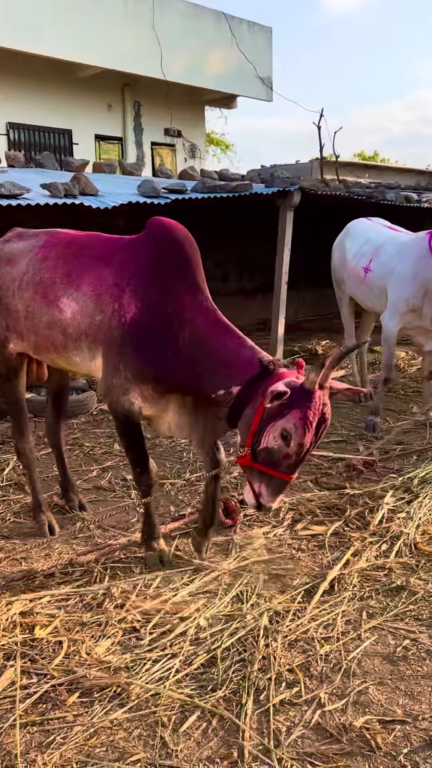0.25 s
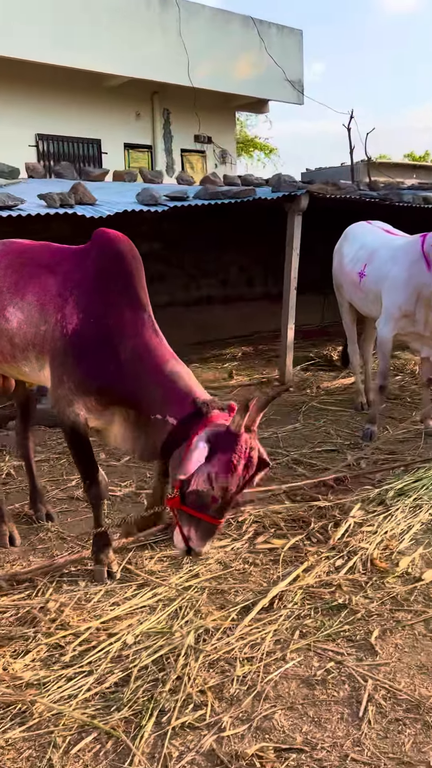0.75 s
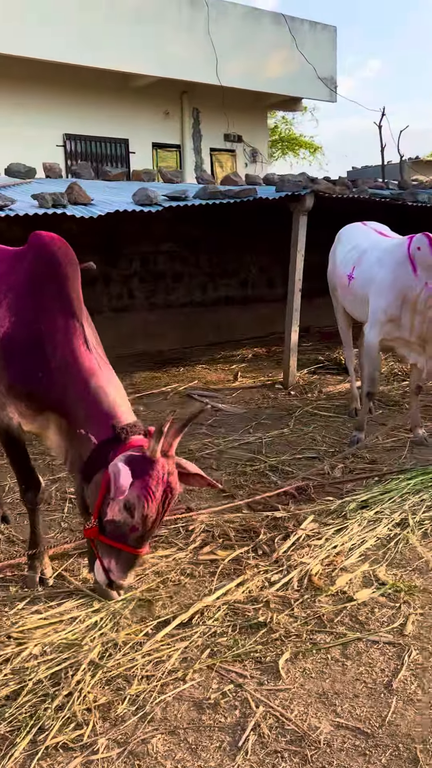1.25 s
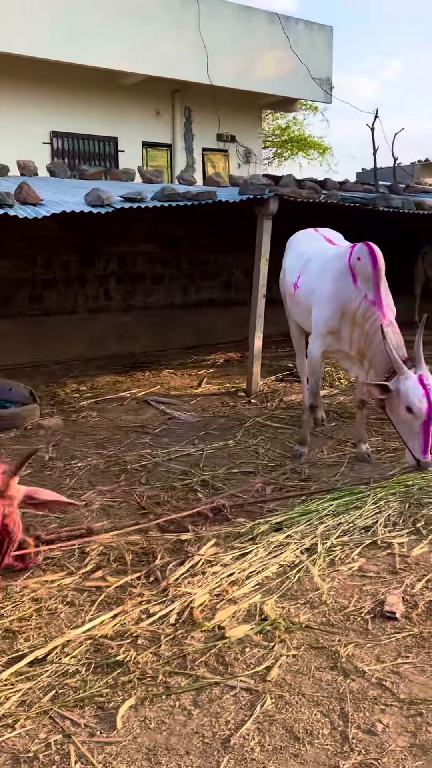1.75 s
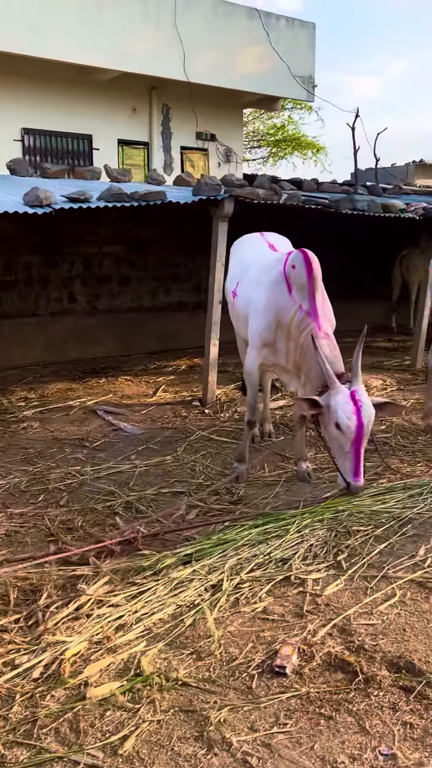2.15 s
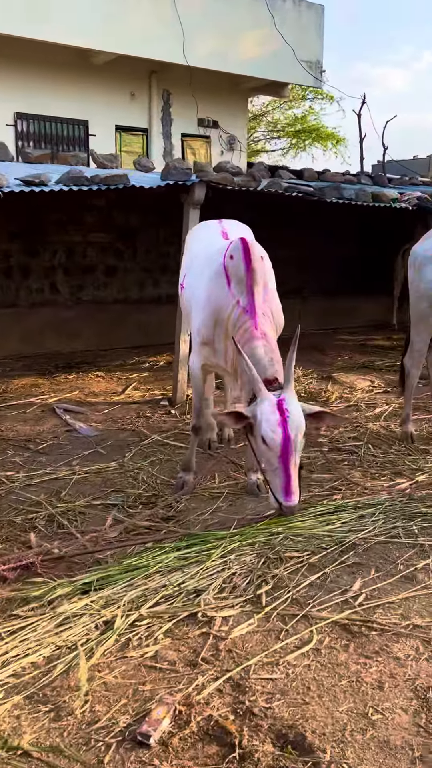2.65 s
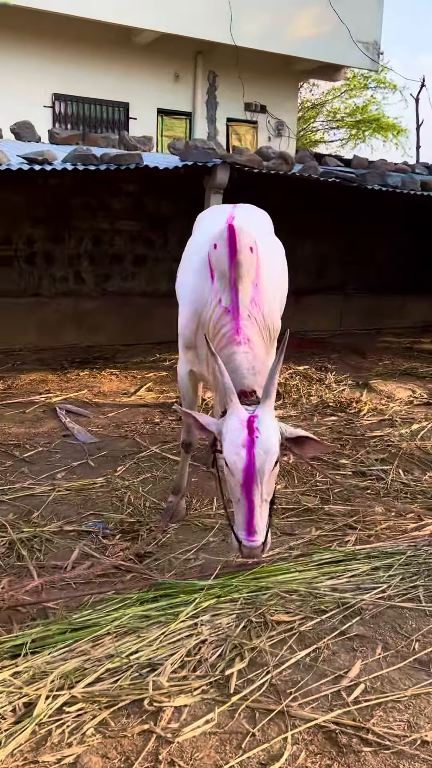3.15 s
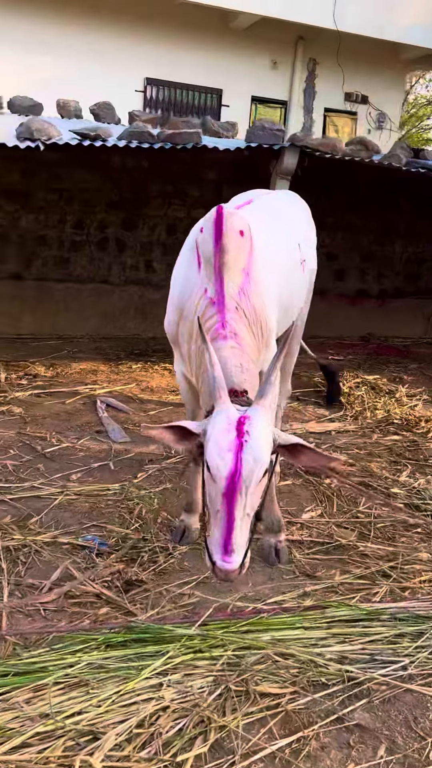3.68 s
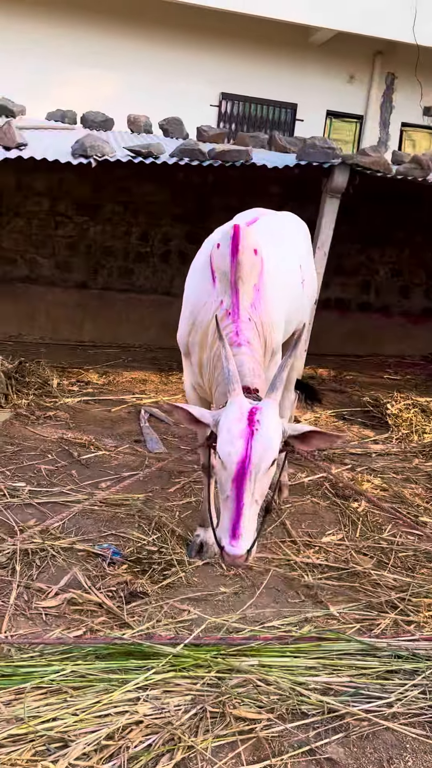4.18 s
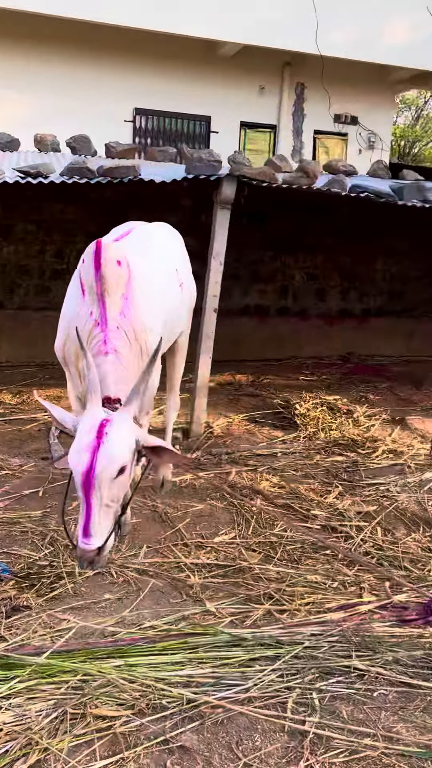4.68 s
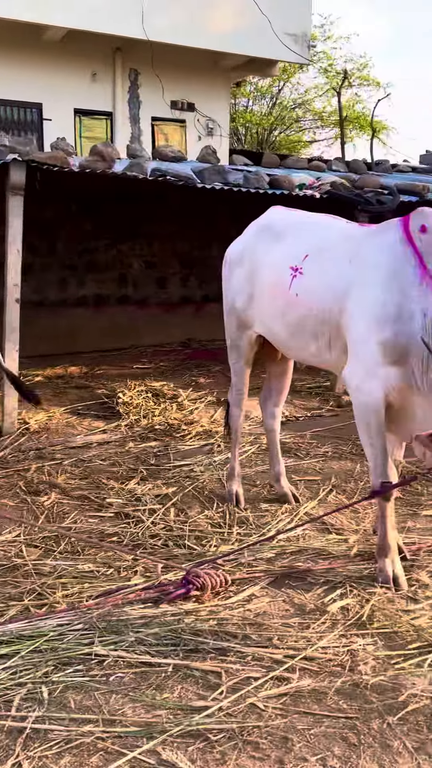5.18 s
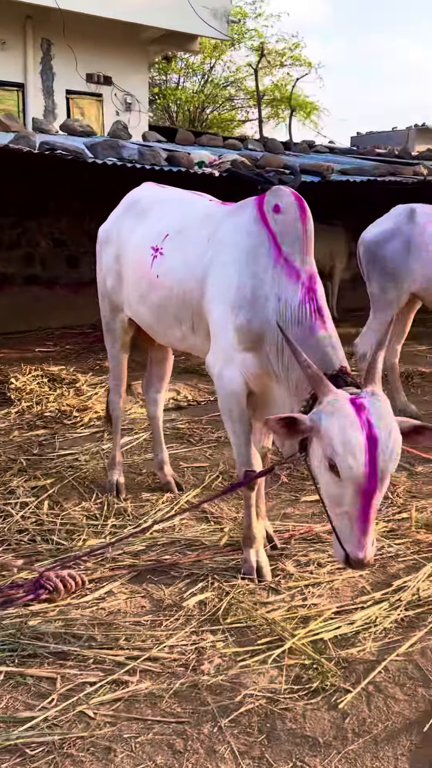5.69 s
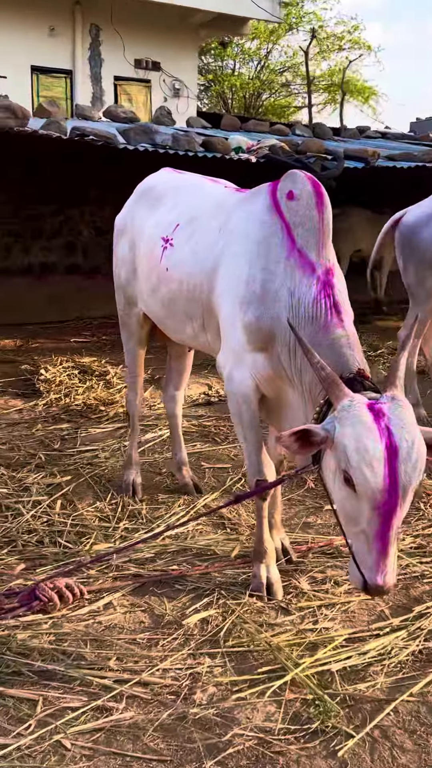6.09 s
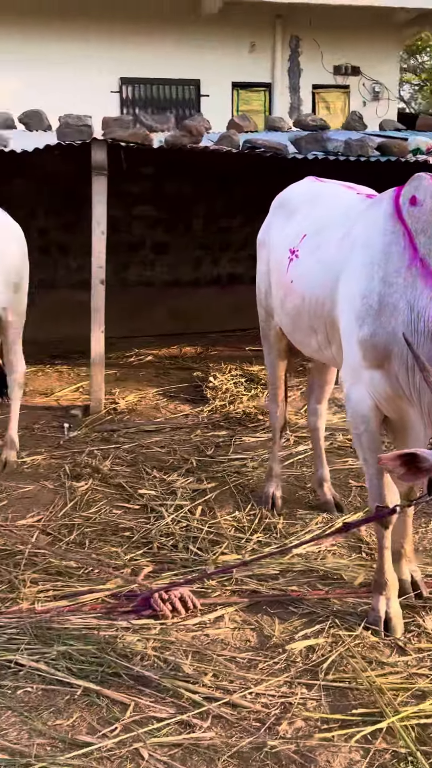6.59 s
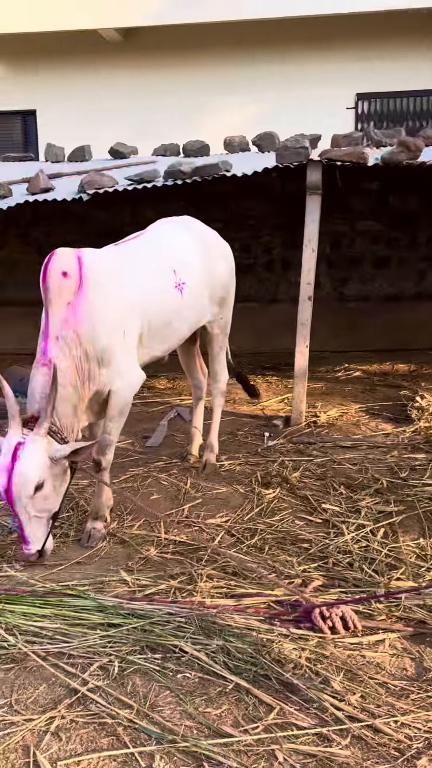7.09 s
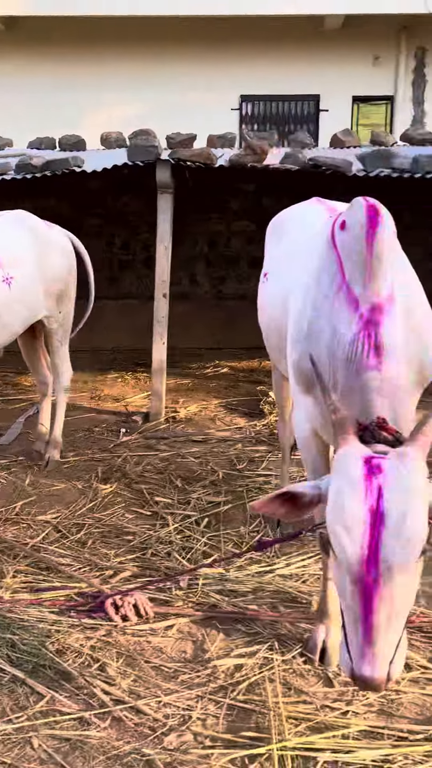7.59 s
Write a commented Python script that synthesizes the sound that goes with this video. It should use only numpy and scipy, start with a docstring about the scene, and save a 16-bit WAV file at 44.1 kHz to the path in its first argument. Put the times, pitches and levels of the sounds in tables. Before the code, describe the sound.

Close to a hand-held stereo microphone in an open farmyard, bullocks crush dry straw. A busy crackling burst opens, then eases to near quiet. Stronger crunches return with a breathy nostril blow, then isolated hard bites and snaps, followed by steady chewing rustle and little hollow knocks. Low wind and a distant engine drawing away lie beneath; faint birds chirp.

```python
"""Bullocks nose through and chew dry straw in an open yard, close to a hand-held pair of microphones.
From the start: crushed and loose straw (dense cracks ringing in stems), sharp snaps (noise bursts through
a resonance), wind (coloured noise) and a far engine (sine orders of a gliding firing rate) underneath.
From 1.6 s nostrils blow (flutter on shaped noise); from 2.3 s a bird chirps (gliding sines).
From 4.5 s a hollow stem is knocked (decaying modes); from 4.8 s the housing thumps (low dying sines)."""
import sys
import numpy as np
from scipy import signal
from scipy.fft import rfft, irfft, next_fast_len
from scipy.io import wavfile

SR = 44100
rng = np.random.default_rng(int(sys.argv[2]) if len(sys.argv) > 2 else 0)


def transcribe(signal):
    """Save signal, clipped to [-1, 1], as a 16-bit WAV file at the path in sys.argv[1]."""
    frames = np.atleast_2d(signal).T
    limited = np.clip(frames, -1, 1)
    pcm = np.round(limited * 32767).astype(np.int16)
    wavfile.write(sys.argv[1], SR, pcm)


N = 345744
PAD = next_fast_len(N + 8192)   # FFT length, samples

# Levels are at the source, ahead of stem resonances, port shading and output stage.
# Stalks crushed by a tug or bite: [t/s, length/s, stalk level/dB, husk level/dB]
CRUNCHES = [(0.019, 0.016, -16.5, -23), (0.059, 0.014, -21, -30), (0.11, 0.017, -27, -39),
            (0.13, 0.022, -20.5, -29), (0.16, 0.022, -21, -22.5), (0.193, 0.05, -16, -27),
            (0.258, 0.054, -18, -27.5), (0.321, 0.1, -24.5, -34), (0.46, 0.051, -32, -49),
            (0.515, 0.045, -27, -35), (0.578, 0.06, -30, -37), (0.657, 0.065, -33, -36.5),
            (0.755, 0.069, -37, -44), (0.957, 0.066, -38.5, -41), (1.052, 0.086, -44, -43.5),
            (1.406, 0.061, -36.5, -41.5), (1.483, 0.091, -30, -35), (1.577, 0.052, -20, -25.5),
            (1.64, 0.042, -14, -24), (1.701, 0.06, -21, -29), (1.78, 0.045, -15, -25),
            (1.867, 0.023, -15.5, -26), (1.909, 0.078, -20.5, -35), (2, 0.037, -22, -28),
            (2.083, 0.043, -22, -37), (2.157, 0.076, -25.5, -50), (2.174, 0.14, -31, -33.5),
            (2.464, 0.062, -11.5, -17.5), (2.529, 0.016, -8.5, -14), (2.734, 0.15, -34, -39),
            (2.896, 0.095, -34, -38.5), (2.972, 0.043, -26.5, -31.5), (3.039, 0.055, -20.5, -28),
            (3.104, 0.073, -29, -31), (3.215, 0.074, -37.5, -44.5), (3.295, 0.11, -38.5, -40),
            (3.554, 0.05, -9.5, -21.5), (3.614, 0.042, -8, -16), (3.669, 0.078, -22, -25),
            (3.768, 0.11, -31.5, -37), (3.989, 0.068, -30.5, -36.5), (4.065, 0.05, -31.5, -32.5),
            (4.141, 0.079, -28.5, -33), (4.217, 0.072, -26.5, -31.5), (4.345, 0.087, -34.5, -40.5),
            (4.433, 0.092, -30.5, -36.5), (4.549, 0.072, -22, -31.5), (4.622, 0.061, -22.5, -32),
            (4.711, 0.06, -25, -35.5), (4.777, 0.071, -26, -31.5), (4.868, 0.065, -22.5, -36),
            (4.922, 0.086, -26.5, -31.5), (5.038, 0.085, -24.5, -32), (5.118, 0.041, -21.5, -32.5),
            (5.198, 0.071, -25, -34.5), (5.276, 0.042, -25, -32), (5.358, 0.055, -32.5, -36),
            (5.42, 0.099, -29.5, -39.5), (5.532, 0.083, -30.5, -41), (5.613, 0.051, -31, -38),
            (5.728, 0.046, -28, -39), (5.813, 0.057, -30.5, -37), (5.991, 0.049, -14, -19.5),
            (6.049, 0.048, -8.5, -20.5), (6.115, 0.066, -18, -25.5), (6.214, 0.057, -20, -31),
            (6.345, 0.029, -18.5, -29), (6.408, 0.042, -22.5, -28), (6.51, 0.057, -22.5, -31.5),
            (6.58, 0.071, -27, -31.5), (6.689, 0.06, -24.5, -30), (6.759, 0.076, -29, -31),
            (6.883, 0.073, -26, -31), (6.969, 0.069, -32, -34), (7.079, 0.094, -28.5, -41),
            (7.164, 0.069, -31, -34.5), (7.277, 0.038, -34, -38), (7.307, 0.037, -24, -31),
            (7.364, 0.056, -26, -30), (7.465, 0.075, -25.5, -34), (7.558, 0.047, -30, -38),
            (7.586, 0.11, -34.5, -41.5)]
# Loose straw shifting, curve: [t/s, dull level/dB, bright level/dB]
RUSTLE = [(0, -29, -33.5), (.6, -37, -42.5), (1.3, -52, -55.5), (1.9, -28, -45), (2.44, -43, -47.5),
          (2.6, -32, -38), (2.72, -46, -48.5), (3.0, -35.5, -47), (3.5, -52.5, -57.5), (3.75, -32, -38),
          (3.96, -48, -51), (4.1, -51, -41.5), (4.4, -62, -52), (5.2, -40.5, -47.5), (5.7, -44.5, -45.5),
          (6.4, -38.5, -42.5), (7.36, -44.5, -45), (7.7, -50, -52.5), (7.84, -53, -49.5)]
# Crushed-stalk spectrum: [f/Hz, relative level/dB per Hz]
BODY_SPECTRUM = [(88, -62), (150, 4), (203, -4.5), (282, 5), (480, -0.5), (700, -2.5), (1350, -5.5),
                 (1900, -11), (2600, -12.5), (4000, -36.5), (6000, -43)]
# Dry leaf and husk spectrum: [f/Hz, relative level/dB per Hz]
HUSK_SPECTRUM = [(1470, 17.5), (2500, -2.5), (4600, 2), (6000, -0.5), (8500, -10), (10500, -12.5),
                 (12500, -20), (16000, -13.5)]
# Hollow-stem resonances: [f/Hz, width/Hz, nominal lift/dB]
HOLLOWS = [(500, 90, 4), (2830, 90, 9), (4590, 250, 5)]
# Wind and rumble, curve: [t/s, level/dB]
WIND = [(0, -44), (.6, -32), (1.1, -37), (1.55, -42), (1.8, -34.5), (2.05, -42), (2.6, -45.5), (3.2, -34),
        (3.45, -47), (4.65, -43.5), (5.9, -46), (6.05, -37), (6.3, -42.5), (6.95, -37), (7.45, -31.5),
        (7.65, -37.5), (7.84, -26)]
# Wind and rumble spectrum: [f/Hz, relative level/dB per Hz]
RUMBLE_SPECTRUM = [(22, -11), (43, -3.5), (59, 8.5), (77, 2.5), (140, -10.5), (194, -16.5), (260, -21),
                   (340, -57.5)]
# Far engine gathering speed and drawing away, curve: [t/s, firing f/Hz, level/dB]
ENGINE = [(0, 42.3, -39.5), (1.2, 47.25, -39.5), (2.2, 52.24, -45), (3.2, 55.8, -47), (4.5, 56.4, -51.5),
          (7.84, 56.8, -66)]
# Engine orders: [multiple of firing rate, relative level/dB]
ENGINE_ORDERS = [(1, -1.5), (2, -5.5), (3, -9.5)]
# Single stalks snapping: [t/s, peak level/dB, pitch f/Hz]
SNAPS = [(0.034, -13.5, 355), (0.063, -11.5, 2800), (0.116, -12, 1910), (0.135, -13, 890),
         (0.152, -16, 576), (0.166, -7.5, 1950), (0.2063, -11, 1780), (0.206, -11.5, 594),
         (0.279, -10, 336), (0.306, -18, 300), (0.372, -20, 330), (1.594, -15, 1100), (1.6432, -8, 1800),
         (1.652, -8.5, 4620), (1.729, -12.5, 510), (1.872, -12.5, 450), (2.064, -14.5, 1540),
         (2.171, -16, 1310), (2.3196, -21, 4070), (2.4696, -6.5, 4500), (2.481, -10, 710),
         (2.491, -13.5, 1180), (2.535, -8, 3000), (2.738, -29.5, 398), (2.829, -26.5, 410),
         (2.898, -30, 404), (2.986, -17.5, 373), (2.986, -22, 4930), (3.0518, -17.5, 416),
         (3.053, -10.5, 4770), (3.3055, -20, 1290), (3.328, -31, 4500), (3.563, -15, 2850),
         (3.571, -3, 2720), (3.632, -9, 1150), (3.802, -24, 1490), (4.1486, -23, 4800), (4.579, -16, 576),
         (4.719, -22, 1550), (4.732, -14, 1620), (4.744, -22.5, 474), (4.792, -24, 2640),
         (4.881, -11, 1480), (5.06, -21.5, 400), (5.151, -19, 1370), (5.204, -24, 1350),
         (5.455, -18.5, 463), (5.5142, -22.5, 1200), (5.547, -21, 1000), (5.571, -28, 1400),
         (5.621, -23, 393), (5.742, -32, 446), (5.9988, -5, 1600), (6.009, -7, 1700), (6.0668, -12, 3880),
         (6.323, -11.5, 1540), (6.414, -19, 343), (6.427, -26, 420), (6.532, -15.5, 376),
         (6.531, -14, 4540), (6.602, -21, 1790), (6.71, -18, 440), (6.711, -23, 1290), (7.3762, -17, 4630),
         (7.487, -16, 1010), (7.488, -18, 507), (7.559, -18, 4200)]
# Air blown through the nostrils: [t/s, length/s, level before sag/dB]
SNORTS = [(1.605, 0.65, -22.5), (3.572, 0.17, -28.5), (6.009, 0.54, -27)]
# Nostril noise spectrum: [f/Hz, relative level/dB per Hz]
NOSTRIL_SPECTRUM = [(2500, -30), (3600, -6), (4600, -2), (5700, -7), (6500, -2), (7700, 0), (8600, -10),
                    (10300, -16), (11500, -13), (12700, -23), (13500, -17), (16000, -24)]
# Bird chirps: [t/s, length/s, start f/Hz, f at a quarter/Hz, end f/Hz, level/dB]
CHIRPS = [(2.265, .06, 3050, 3150, 3150, -43), (4.3, .082, 1380, 1400, 1400, -36),
          (7.705, .034, 4080, 4060, 4000, -48), (7.747, .08, 2600, 3060, 3060, -46),
          (7.75, .018, 3950, 4080, 4050, -50), (7.801, .018, 4050, 4100, 4100, -49)]
# Hollow stem knocked: [t/s, contact level/dB]
KNOCKS = [(4.5453, -23), (4.654, -18.5), (4.861, -17), (5.1178, -18.5), (5.7163, -16), (5.885, -25.5),
          (6.134, -19)]
# Modes of the knocked stem: [f/Hz, relative level/dB, t60/s]
KNOCKED_STEM = [(720, -11, .015), (1330, 0, .028), (2080, -4, .012)]
# Low knocks on the hand-held housing: [t/s, level before swell and decay/dB, f/Hz, t60/s]
THUMPS = [(4.762, -1, 77, 0.028), (7.686, -12.5, 69.6, 0.13), (7.8, -13.5, 81.7, 0.8)]
# Left over right port: [f/Hz, level difference/dB]
PORT_SHADE = [(60, -.7), (200, -4), (450, -9.5), (800, -10.5), (1450, -4), (1800, -10), (2300, -2),
              (3000, 2), (4400, 3.5), (5500, 1), (7000, 1), (10000, 0)]
# Share of power unlike in the two ports: [f/Hz, share/0-1]
SPREAD = [(60, .03), (500, .03), (1000, .12), (3200, .2), (4600, .08), (6200, .25), (7500, .06),
          (9000, .004), (16000, .002)]
# Phase lag of left behind right, wound by the path round the housing: [f/Hz, lag/turns]
STRAW_TURNS = [(0, 0), (900, .35), (1400, .26), (1900, .4), (2300, .52), (2800, .72), (4300, 1),
               (5800, 1.35), (7000, .95), (8200, 1.1)]
SNORT_TURNS = [(0, 0), (3000, 1.5), (4200, 1.92), (5200, 1.85), (5650, 1.5), (6500, 1.2), (7400, 1),
               (8200, 1)]
WIND_TURNS = [(0, 0.045), (300, 0.073)]
# Continuation of all three lags at the top: [f/Hz, lag/turns]
TREBLE_TURNS = [(9200, 1.5), (10200, 1.5), (11000, 2), (12300, 2), (12750, 2.5), (14100, 2.5), (14800, 3)]

SWELL_SHARE, FALL_SHARE = 0.41, 0.44   # of a crunch's length
SETTLE_T60_S, SETTLE_DULL_DB, SETTLE_BRIGHT_DB = 0.25, -15, -11
SNORT_ATTACK_S, SNORT_RELEASE_S, SNORT_SAG_DB_PER_S = 0.048, 0.05, 9
CUTOFF_HZ = 16500


def from_db(db):
    """Amplitude gain of a level in dB."""
    return 10 ** (np.asarray(db) / 20)


def rms_one(x):
    """Scaled to rms 1."""
    return x / np.sqrt(np.mean(x ** 2) + 1e-20)


def in_time(rows):
    """Columns of a curve table at every sample."""
    t_s, *columns = np.transpose(rows)
    return [np.interp(np.arange(N) / SR, t_s, column) for column in columns]


def at_hz(points):
    """A [f/Hz, value] table on the FFT grid, straight over log f."""
    grid_hz = np.maximum(np.arange(PAD // 2 + 1) * SR / PAD, 1)
    table_hz, values = np.array(points).T
    return np.interp(np.log(grid_hz), np.log(table_hz), values)


def add_at(out, t_s, burst):
    """Adds a burst in place from t_s, cut at the end of the scene."""
    at = round(t_s * SR)
    out[..., at:at + burst.shape[-1]] += burst[..., :N - at]


def poles(hz, radius):
    """Denominator of a two-pole resonator."""
    return [1, -2 * radius * np.cos(2 * np.pi * hz / SR), radius * radius]


def colour(x, spectrum):
    """Minimum-phase filter (folded cepstrum), so that nothing sounds before a crack; rms 1."""
    cepstrum = irfft(np.log(from_db(at_hz(spectrum))), PAD)
    cepstrum[1:PAD // 2] *= 2
    cepstrum[PAD // 2 + 1:] = 0
    response = np.exp(rfft(cepstrum))
    return rms_one(irfft(rfft(x, PAD) * response, PAD)[..., :N])


def drift(rate_hz):
    """Slow random wander, rms 1: noise through two equal poles at rate_hz."""
    r = np.exp(-2 * np.pi * rate_hz / SR)
    noise = rng.standard_normal(N + SR)
    return rms_one(signal.lfilter([1], [1, -2 * r, r * r], noise)[SR:])   # filter settles for 1 s


def crushing(jolt):
    """Force on the stalks: a jolt, a swell to the peak, a fall; power envelopes for body and husk."""
    body, husk = np.zeros(N), np.zeros(N)
    t = np.arange(SR // 4) / SR
    for t_s, length_s, body_db, husk_db in CRUNCHES:
        rise_s, fall_s = SWELL_SHARE * length_s, FALL_SHARE * length_s
        swell = jolt + (1 - jolt) * np.minimum(t / rise_s, 1)
        force = swell * np.exp(-(np.maximum(t - rise_s, 0) / fall_s) ** 1.38)
        add_at(body, t_s, (from_db(body_db) * force) ** 2)
        add_at(husk, t_s, (from_db(husk_db) * force) ** 2)
    return body, husk


def giving_way(per_s, settle_s, steady):
    """Stalks give way a few at a time: sudden jumps that die quickly over a steady share; rms 1."""
    jumps = rng.random(N) * (rng.random(N) < per_s / SR)
    power = signal.lfilter([1], [1, -np.exp(-1 / (settle_s * SR))], jumps + 1e-18)
    return np.sqrt(steady + (1 - steady) * power / power.mean())


def settling(power, db):
    """Power of the straw that slides on after a crunch and dies away."""
    r = from_db(-60 / (SETTLE_T60_S * SR)) ** 2
    return from_db(db) ** 2 * signal.lfilter([1 - r], [1, -r], power)


def grains(per_s, uneven_db):
    """Two unrelated trains of random cracks, signs random, sizes spread exponentially in dB."""
    sizes_db = uneven_db * np.minimum(rng.exponential(1, (2, N)), 3)
    sizes = from_db(sizes_db) * rng.choice([-1, 1], (2, N))
    return sizes * (rng.random((2, N)) < per_s / SR)


def stems(cracks, low_hz, high_hz, cycles, patchy_db):
    """Each crack rings in one of 14 stem sizes for a few cycles; sizes come and go."""
    pitches_hz = np.geomspace(low_hz, high_hz, 14)
    dealt, out = rng.integers(0, len(pitches_hz), cracks.shape), 0
    for k, hz in enumerate(pitches_hz):
        own_cracks = cracks * (dealt == k) + 1e-18
        rung = signal.lfilter([1, 0, -1], poles(hz, np.exp(-hz / cycles / SR)), own_cracks)
        presence = from_db(patchy_db * drift(14.6))
        out = out + presence * np.sqrt(hz) * rms_one(rung)   # even power per Hz before the colour
    return out


def straw():
    """Cracks come in clumps under each crush and as a finer bed while loose straw shifts."""
    body, husk = crushing(jolt=0.45)
    dull_db, bright_db = in_time(RUSTLE)
    clumps = giving_way(per_s=90, settle_s=.005, steady=.3)
    dull_stir = from_db(3.6 * drift(21)) ** 2
    bright_stir = from_db(2.2 * drift(49)) ** 2
    dull_power = settling(body, SETTLE_DULL_DB) + from_db(dull_db) ** 2
    bright_power = settling(husk, SETTLE_BRIGHT_DB) + from_db(bright_db) ** 2
    low = np.sqrt(body * clumps ** 2 + dull_power * dull_stir)
    high = np.sqrt(husk * clumps + bright_power * bright_stir)

    thick_cracks, thin_cracks = grains(per_s=2200, uneven_db=3.0), grains(per_s=7000, uneven_db=-1.5)
    thick = stems(thick_cracks, low_hz=200.2, high_hz=4500, cycles=1.2, patchy_db=2.5)
    thin = stems(thin_cracks, low_hz=2320, high_hz=15800, cycles=3.04, patchy_db=3.5)
    thick, thin = colour(thick, BODY_SPECTRUM), colour(thin, HUSK_SPECTRUM)

    # hard tugs split the stems: brighter, less of the lowest thud
    hard = np.clip(low / from_db(-13.0), 0, 1)
    crisp = signal.sosfilt(signal.butter(2, 1200, "high", fs=SR, output="sos"), thick)
    boom = signal.sosfilt(signal.butter(1, 330, fs=SR, output="sos"), thick)
    stalks = (1 - 0.52 * hard) * thick + 0.64 * hard * crisp - np.clip(2.15 * hard, 0, .8) * boom
    return low * stalks + high * thin


def hollow(x):
    """A few hollow-stem resonances lift their bands, now more, now less."""
    for hz, width_hz, db in HOLLOWS:
        r = np.exp(-np.pi * width_hz / SR)
        band = signal.lfilter(np.array([1, 0, -1]) * (1 - r * r) / 2, poles(hz, r), x)
        x = x + (from_db(db) - 1) * from_db(3 * drift(13) - 4) * band
    return x


def wind():
    """Wind and rumble: low coloured noise, lumpy in level."""
    level = from_db(in_time(WIND)[0] + 2.0 * drift(27))
    return level * colour(rng.standard_normal((2, N)), RUMBLE_SPECTRUM)


def engine():
    """Low orders of the firing rate, each wavering in level."""
    firing_hz, db = in_time(ENGINE)
    phase = 2 * np.pi * np.cumsum(firing_hz) / SR
    out = np.zeros(N)
    for order, order_db in ENGINE_ORDERS:
        level = from_db(db + order_db + 2.6 * drift(5.0))
        out += level * np.sqrt(2) * np.sin(order * phase)   # sqrt 2: sine of rms 1
    return out


def snaps(burst_s, burst_cycles, cycles, break_size):
    """A break and a few ms of noise through a broad resonance at its pitch; low pitches last longer."""
    out, t = np.zeros((2, N)), np.arange(900) / SR
    for (t_s, db, hz), noise in zip(SNAPS, rng.standard_normal((len(SNAPS), 2, len(t)))):
        crack = (noise + break_size * (t == 0)) * np.exp(-t / (burst_s + burst_cycles / hz))
        stalk = [1, 0, -0.997], poles(hz, np.exp(-hz / cycles / SR))
        rung = rms_one(signal.lfilter(*stalk, signal.lfilter(*stalk, crack)))
        snap = rung + hz / 20000 * rms_one(crack)   # thin stalks keep more of the bare tick
        add_at(out, t_s, from_db(db) * snap / np.abs(snap).max())
    return out


def snorts():
    """Smooth turbulent air with a slight flutter; each blow rises, sags and stops."""
    level, t = np.zeros(N), np.arange(N) / SR
    for t_s, length_s, db in SNORTS:
        attack, release = (t - t_s) / SNORT_ATTACK_S, (t_s + length_s - t) / SNORT_RELEASE_S
        edge = np.clip(np.minimum(attack, release), 0, 1)
        level += edge * from_db(db - SNORT_SAG_DB_PER_S * np.clip(t - t_s, 0, length_s))
    flutter = from_db(0.78 * drift(49))
    return level * flutter * colour(rng.standard_normal((2, N)), NOSTRIL_SPECTRUM)


def birds():
    """Short gliding sines that waver in level."""
    out = np.zeros(N)
    for t_s, length_s, start_hz, early_hz, end_hz, db in CHIRPS:
        u = np.linspace(0, 1, round(length_s * SR))
        hz = np.interp(u, [0, .25, 1], [start_hz, early_hz, end_hz])
        envelope = np.sqrt(np.sin(np.pi * u).clip(0))
        add_at(out, t_s, from_db(db) * envelope * np.sin(2 * np.pi * np.cumsum(hz) / SR))
    return out * from_db(3 * drift(40))


def knocks(contact_s, bare):
    """A brief rattling contact sets the stem's modes ringing; the contact itself is heard too."""
    touch, t = np.zeros(N), np.arange(200) / SR
    for (t_s, db), noise in zip(KNOCKS, rng.standard_normal((len(KNOCKS), len(t)))):
        rattle = noise * np.exp(-t / contact_s)
        add_at(touch, t_s, from_db(db) * rattle / np.sqrt(np.sum(rattle ** 2)))   # set by energy
    out = bare * touch
    for hz, db, t60_s in KNOCKED_STEM:
        mode = [0, np.sin(2 * np.pi * hz / SR)], poles(hz, from_db(-60 / (t60_s * SR)))
        out = out + from_db(db) * signal.lfilter(*mode, touch + 1e-18)
    return out


def thumps(rise_s):
    """Knocks on the housing: soft low sines that swell and die."""
    out, t = np.zeros(N), np.arange(SR // 3) / SR
    for t_s, db, hz, t60_s in THUMPS:
        envelope = from_db(db - 60 * t / t60_s) * (1 - np.exp(-t / rise_s))
        add_at(out, t_s, envelope * np.sin(2 * np.pi * hz * t))
    return out


def ports(pair, turns):
    """One sound reaches both ports, the left shifted and shaded; the second adds a share of opposite sign."""
    near, wide = rfft(pair, PAD)
    share = np.clip(at_hz(SPREAD), 0, 1)
    near, wide = near * np.sqrt(1 - share), wide * np.sqrt(share)
    table_hz, lag_turns = np.transpose(turns + TREBLE_TURNS)
    lag_turns = np.interp(np.arange(PAD // 2 + 1) * SR / PAD, table_hz, lag_turns)
    # half the lag and level difference to each port, in opposite senses
    shade = from_db(at_hz(PORT_SHADE) / 2) * np.exp(-1j * np.pi * lag_turns)
    return irfft([(near + wide) * shade, (near - wide) / shade], PAD)[:, :N]


def scene():
    """Straw, bird and stem knocks share one phase path, snorts another, low sounds nearly in phase."""
    common = [[1], [0]]   # no unlike share
    cracks = snaps(burst_s=.002, burst_cycles=1.5, cycles=0.8, break_size=5.0)
    near = hollow(straw() + cracks) + birds() + knocks(contact_s=0.0043, bare=0.91) * common
    lows = wind() + (engine() + thumps(rise_s=0.0082)) * common
    return ports(near, STRAW_TURNS) + ports(snorts(), SNORT_TURNS) + ports(lows, WIND_TURNS)


def record(dry):
    """The deepest bass is lost, peaks are rounded just under full scale, the top is cut."""
    dry = signal.sosfilt(signal.butter(2, 36, "high", fs=SR, output="sos"), dry)
    rounded = dry / (1 + np.abs(dry / .97) ** 4) ** .25
    return signal.sosfilt(signal.cheby2(14, 70, CUTOFF_HZ, fs=SR, output="sos"), rounded)


dry = scene()
out = record(dry)
transcribe(out)
```